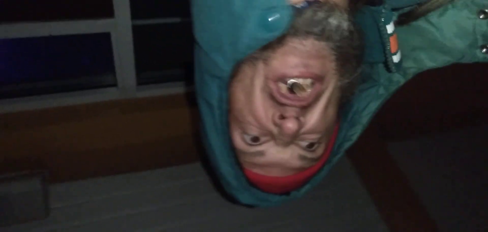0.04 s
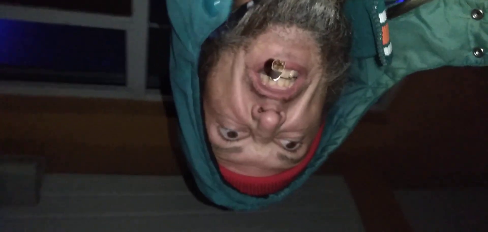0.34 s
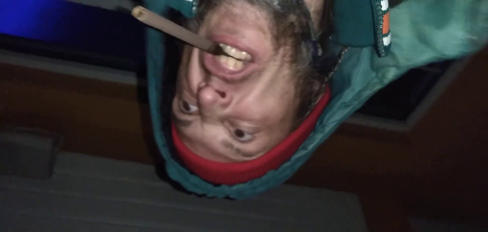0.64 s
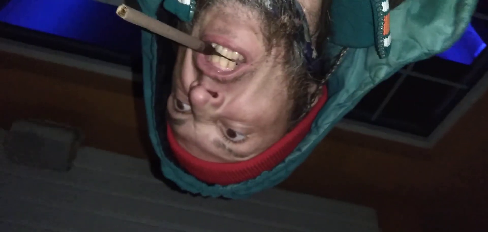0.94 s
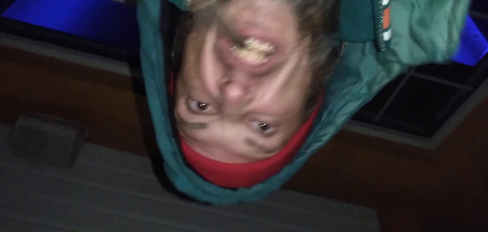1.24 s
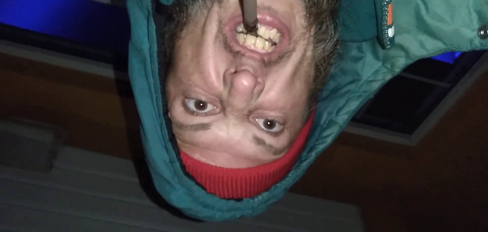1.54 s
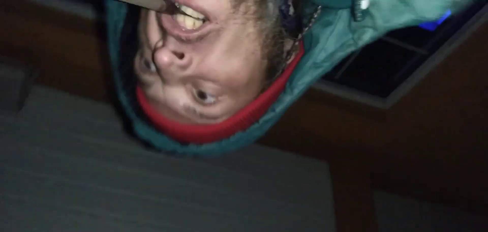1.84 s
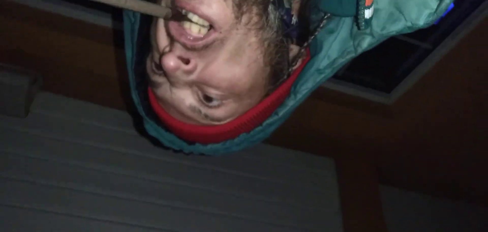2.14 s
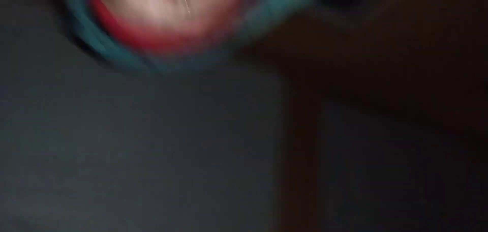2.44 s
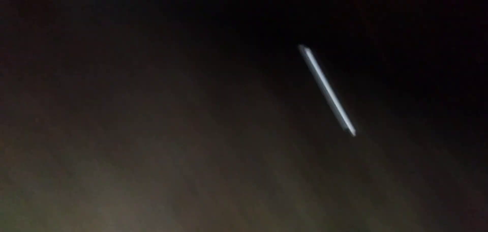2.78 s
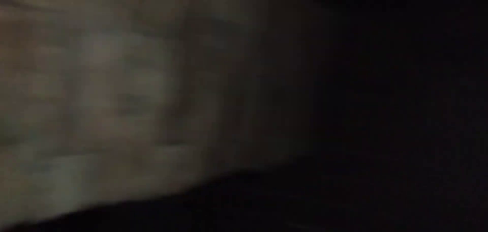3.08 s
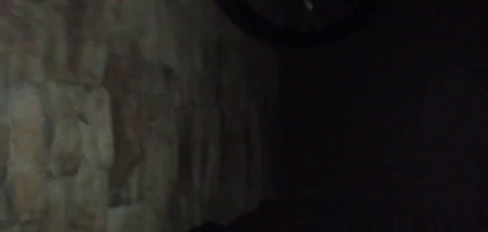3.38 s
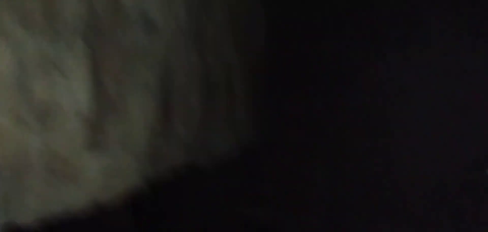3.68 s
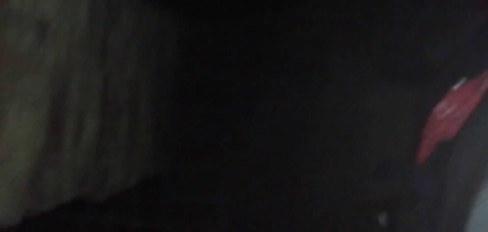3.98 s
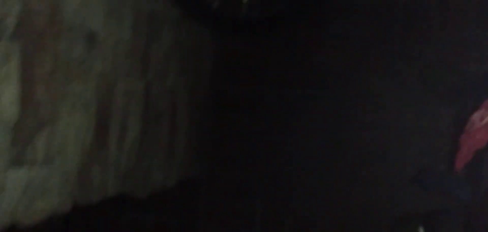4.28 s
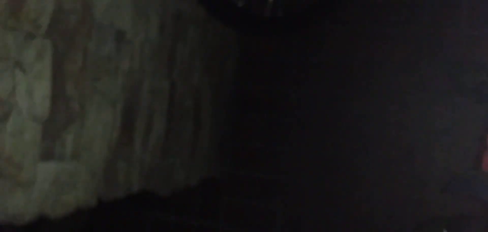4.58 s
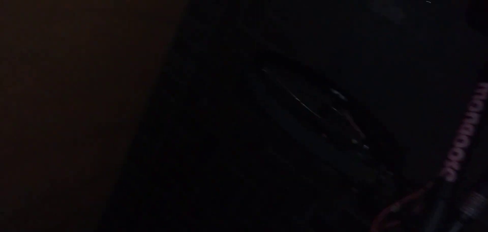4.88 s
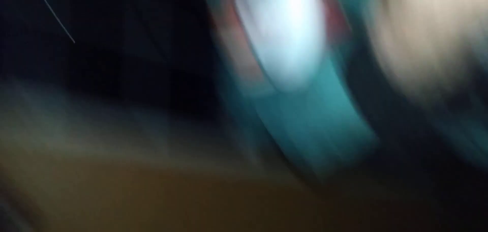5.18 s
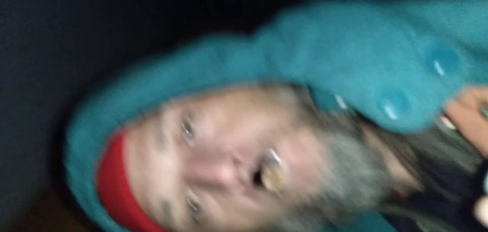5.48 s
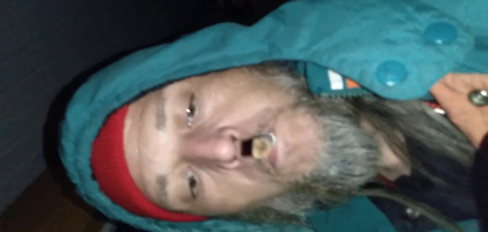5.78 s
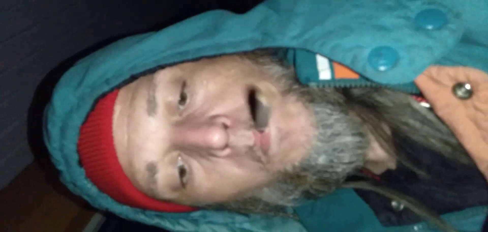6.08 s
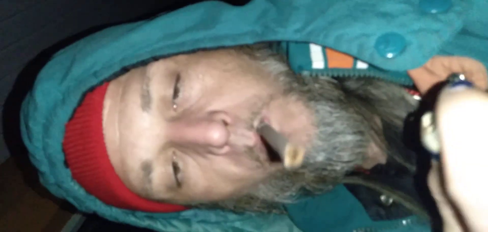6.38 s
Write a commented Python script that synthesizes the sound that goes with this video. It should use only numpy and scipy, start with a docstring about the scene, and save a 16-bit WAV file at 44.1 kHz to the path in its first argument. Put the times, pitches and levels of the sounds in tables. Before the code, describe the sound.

A faint distant rumble and a low electrical hum lie under the whole scene, a quiet porch at night. For the first two seconds a nylon jacket stirs softly near the microphone, with tiny, thin, ringing ticks on the right. Sharper ticks come around 2.3 seconds and a louder hissy swish at 2.8. From about 3.5 seconds the cloth drags across the left microphone in uneven, rasping rubs, with a sharp tick at 3.7 and one loud, short bump at 3.9. At 4.5 seconds a cigarette lighter gives a rapid burst of hard, bright clicks very close on the left, the loudest clicks heard. The jacket rasps again from about 5 seconds, and a second, softer and scratchier burst of clicks follows at 5.3 to 5.4. Faint swishes and a few light ticks continue until the end, at about 6.7 seconds.

```python
"""A nylon jacket swishes close to a phone's two microphones, held by a man on a quiet porch at night.
As he fetches a lighter, the weave slides over itself with a hiss and a rasp; the cloth also drags
across the left microphone and bumps it once. The lighter gives two bursts of sharp clicks, close left.
Tiny ticks ring the right microphone's port; distant rumble and a mains hum lie underneath."""
import sys
import numpy as np
from scipy import signal
from scipy.fft import rfft, irfft, next_fast_len
from scipy.io import wavfile
from scipy.ndimage import uniform_filter1d

SR = 44100
rng = np.random.default_rng(int(sys.argv[2]) if len(sys.argv) > 2 else 0)


def wrap_up_sound(samples):
    """Save the sound to the file named by the first command line argument, as 16-bit audio."""
    columns = np.atleast_2d(samples).T
    # keep every value between -1 and 1, then stretch to whole-number steps
    tamed = np.clip(columns, -1, 1)
    steps = np.round(tamed * 32767).astype(np.int16)
    wavfile.write(sys.argv[1], SR, steps)


N = 292277
TIME = np.arange(N) / SR

# The narrow resonance of the right microphone's port. Each row: frequency in Hz, gain in dB.
RIGHT_PORT = [(3500, -44), (5500, -21), (6600, -7), (7200, 1.5), (7800, -8.5), (9000, -24.5), (12000, -41),
              (16000, -43.5)]
# Cloth dragged across the left port, heard only there. Each row: start, attack, hold and release in
# seconds, then in dB before trims: swish, rasp and sheen relative to the swish, low rush.
LEFT_DRAGS = [(2.42, 0.38, 0.37, 0.16, -68, -2, -2.5, -62),
              (3.647, 0.17, 0.022, 0.027, -55, 3, -5.5, -51.5),
              (3.771, 0.091, 0.074, .03, -30.5, -11.5, -3, -47),
              (3.889, 0.038, .1, 0.0091, -30.5, -8.5, -12.5, -36),
              (4.007, 0.026, .41, 0.084, -45, -1.5, -25, -39),
              (4.108, 0.039, .01, 0.052, -32, -7, -10.5, -39),
              (4.171, .04, 0.037, 0.0085, -40, -12, -7, -37),
              (4.34, 0.047, 0.0085, 0.031, -33.5, -4.5, -8.5, -30),
              (4.472, 0.034, .055, .011, -33, -7, -3, -30),
              (4.573, 0.014, 0.022, 0.0021, -36.5, -8, -12.5, -38),
              (4.611, 0.0091, 0.074, 0.0052, -45, -9.5, -2.5, -53),
              (4.674, 0.016, 0.12, 0.12, -63, 9.5, -1.5, -59.5),
              (4.923, .05, 0.024, 0.037, -64, 8.5, -3, -64.5),
              (4.986, 0.13, 0.065, .03, -69.5, 23.5, 1, -53),
              (5.127, 0.056, .01, .018, -65, 21, -1.5, -44.5),
              (5.21, 0.072, 0.018, .025, -53, 16.5, 0.5, -42),
              (5.258, 0.0215, 0.039, .03, -45.5, 0, 2, -56),
              (5.325, 0.046, 0.025, 0.0068, -36, -4, -0.5, -48.5),
              (5.39, .02, 0.056, 0.077, -63, -1.5, 0, -58.5)]


def undb(db):
    """Decibels to gain."""
    return 10 ** (np.asarray(db) / 20)


def unit(x):
    """Scale to rms 1."""
    return x / np.std(x)


def response(spectrum, size):
    """Gain at each FFT bin, from rows of frequency in Hz and gain in dB."""
    hz, db = np.transpose(spectrum)
    bin_hz = np.arange(size // 2 + 1) * SR / size
    return undb(np.interp(np.log(bin_hz + 1), np.log(hz), db))


def colour(x, spectrum):
    """Give x a spectrum, at rms 1."""
    size = next_fast_len(N, True)
    return unit(irfft(rfft(x, size) * response(spectrum, size), size)[:N])


def ring(spectrum, size=1024):
    """Causal impulse response with the given spectrum, peak 1."""
    cepstrum = irfft(np.log(response(spectrum, size)))
    cepstrum[1:size // 2] *= 2  # minimum phase: the energy comes first
    cepstrum[size // 2 + 1:] = 0
    ringing = irfft(np.exp(rfft(cepstrum)))
    return ringing / np.abs(ringing).max()


def walk(rate):
    """Glide between random levels, rate of them a second, at rms 1."""
    hold = max(int(SR / rate), 2)
    steps = np.repeat(rng.standard_normal(N // hold + 1), hold)[:N]
    return unit(uniform_filter1d(steps, hold))


def friction(rate, spread_db, hiss):
    """Threads slipping over each other: about rate tiny snaps a second over a smooth hiss."""
    snaps = (rng.random(N) < rate / SR) * rng.choice([-1, 1], N)
    sizes = undb(spread_db * np.minimum(rng.exponential(size=N), 4))
    return unit(unit(snaps * sizes) + hiss * rng.standard_normal(N))


def folds(x, patchy_db=2.5, width_bins=4):
    """The folds of the cloth keep changing shape: narrow resonances come and go at random."""
    spectrum = signal.stft(x, nperseg=512)[2]
    patches = uniform_filter1d(rng.standard_normal(spectrum.shape), size=width_bins, axis=0)
    patches = unit(uniform_filter1d(patches, size=24, axis=1))
    return unit(signal.istft(spectrum * undb(patchy_db * patches))[1][:N])


def swells(moves, levels_db, bend=1.52):
    """Summed envelope of moves: the cloth speeds up (gently if bend > 1), slides steadily, runs out."""
    power = np.full(N, 1e-14)
    for (start, attack, hold, release), db in zip(moves[:, :4], levels_db):
        span = slice(max(int(start * SR), 0), int((start + attack + hold + 10 * release) * SR))
        t = TIME[span] - start
        speed = np.sin(np.pi / 2 * np.clip(t / attack, 0, 1)) ** bend
        run_out = np.exp(-np.maximum(t - attack - hold, 0) / release)
        power[span] += (undb(db) * speed * run_out) ** 2
    return np.sqrt(power)


def strikes(starts_s, peaks_db, spectrum, grit, tail_s):
    """Each blow is an impulse and a short scatter of vibration, heard through a resonance."""
    out, resonance = np.zeros(N), ring(spectrum)
    t = TIME[:len(resonance)]
    scatter = np.reshape(grit, (-1, 1)) * rng.standard_normal((len(starts_s), len(t)))
    for start_s, db, noise in zip(starts_s, peaks_db, scatter):
        force = (t == 0) + noise * np.exp(-t / tail_s)
        blow = signal.fftconvolve(force, resonance)
        start = int(start_s * SR)
        out[start:start + len(blow)] += (undb(db) * blow / np.abs(blow).max())[:N - start]
    return out


def night_air(level_db=-62, apart_hz=700):
    """Distant rumble around the porch; the bass is alike at both microphones, the treble is not."""
    # The porch's background noise. Each row: frequency in Hz, gain in dB.
    air_spectrum = [(20, -29), (45, -18), (90, 0.5), (170, 0.5), (260, -6), (400, -15.5), (550, -22),
                    (800, -21.5), (1300, -26.5), (3000, -38), (5500, -33.5), (7500, -31.5), (10000, -42.5),
                    (16000, -43.5)]
    lowpass = signal.butter(1, apart_hz, fs=SR, output="sos")
    highpass = signal.butter(1, apart_hz, "high", fs=SR, output="sos")
    bass = signal.sosfilt(lowpass, rng.standard_normal(N))
    trebles = signal.sosfilt(highpass, rng.standard_normal((2, N)))
    return undb(level_db) * np.array([colour(bass + treble, air_spectrum) for treble in trebles])


def mains_hum(waver_db=-0.14):
    """A faint hum, alike at both microphones; its partials change balance as the phone is turned round."""
    # The hum's partials. Each row: frequency in Hz, rms level in dB before the turn and after it.
    partials = [(61, -58.5, -65), (123.5, -70.5, -67.5), (185.5, -67.5, -68.5), (349, -94, -76.5)]
    # The turn of the phone: start and end in seconds.
    turn_s = [4.4, 5.2]
    hum = np.zeros(N)
    for hz, *levels_db in partials:
        db = np.interp(TIME, turn_s, levels_db) + waver_db * walk(rate=4)
        phase = 2 * np.pi * hz * TIME + 0.3 * walk(rate=4.2)
        hum += np.sqrt(2) * undb(db) * np.sin(phase)
    return hum


def ticks():
    """Light ticks of clothing and grip; the right port rings with them like a thin whistle."""
    # Touches on and near the phone. Each row: start in seconds, left peak in dB, right peak in dB.
    touches = [(0.1098, -64, -43.5), (0.278, -51, -44.5), (.2845, -53, -42), (0.345, -53, -43),
               (0.4182, -51, -35), (0.438, -47, -38.5), (.8341, -62, -44.5), (1.2554, -65, -52),
               (1.2728, -62, -44), (1.2844, -58, -45), (1.32, -58, -43), (1.3371, -48, -38),
               (1.3405, -49, -33), (1.4573, -64, -40), (1.4692, -70, -46), (1.7536, -57, -41.5),
               (2.2365, -24.5, -33), (2.3902, -36, -39), (2.3971, -26, -38), (2.4358, -38, -33),
               (2.4647, -42, -35), (2.496, -50, -39), (2.513, -47, -35), (2.5379, -44, -34.5),
               (2.6165, -31, -31.5), (2.7949, -29, -25), (2.8928, -30, -32), (3.345, -44, -49),
               (3.7484, -16.5, -42), (5.218, -52, -39), (5.6432, -33, -52), (6.12, -45.5, -56),
               (6.2764, -49.5, -61), (6.5894, -51.5, -58)]
    # A tick at the left microphone. Each row: frequency in Hz, gain in dB.
    left_spectrum = [(1500, -40), (4000, -14), (6300, -15.5), (7600, -3.5), (9500, -7.5), (12000, -13),
                     (16000, -32)]
    starts_s, left_db, right_db = np.transpose(touches)
    return np.array([strikes(starts_s, left_db, left_spectrum, grit=0.15, tail_s=0.0028),
                     strikes(starts_s, right_db, RIGHT_PORT, grit=0.054, tail_s=0.0046)])


def lighter(right_db=-38):
    """Hard, dry clicks right next to the left microphone; the right one barely hears them."""
    # Two bursts of clicks. Each row: start in seconds, level in dB, grit from 0 (snap) to 1 (scrape).
    clicks = [(4.4863, -13, .3), (4.4949, -13, .4), (4.4968, 1.5, .19), (4.4987, -9, .12),
              (4.511, -11, .15), (4.518, -9, .2), (4.5205, -10, .4), (4.5216, -1.5, .13), (4.5318, .5, .11),
              (4.5446, -.5, .05), (4.5632, -2.5, .07), (4.5951, -11, .2), (5.305, -16, .15),
              (5.3587, -13, .5), (5.3632, -11, .4), (5.365, -7, .35), (5.3731, -10, .5), (5.38, -11.5, .3),
              (5.383, -7, .35), (5.3853, -9, .2), (5.3902, -12, .4), (5.3935, -7, .35)]
    # The bright ring of one click. Each row: frequency in Hz, gain in dB.
    click_spectrum = [(300, -14), (1200, -6.5), (4000, -5), (6500, 2.5), (8000, 6.5), (10000, 0.5),
                      (13000, -1.5), (16000, -8)]
    starts_s, levels_db, grit = np.transpose(clicks)
    close = strikes(starts_s, levels_db, click_spectrum, grit, tail_s=0.001)
    return np.outer([1, undb(right_db)], close)


def bump(at_s=3.9279, push=3.6, start_hz=860, end_hz=125, settle_s=0.00081, decay_s=0.0013):
    """A knock on the left port: the trapped air rebounds ever more slowly and overloads the microphone."""
    t = np.maximum(TIME - at_s, 0)
    cycles = end_hz * t + (start_hz - end_hz) * settle_s * (1 - np.exp(-t / settle_s))
    pressure = push * np.sin(2 * np.pi * cycles) * np.exp(-t / decay_s)
    return -0.95 * np.tanh(pressure)


def rubbing(press_db=1, firm_db=-30, deepen=0.35, catch_db=2.0):
    """Cloth on the left port: an uneven rush, with a rumble that gains on it as it presses harder."""
    # The rush of cloth over the port. Each row: frequency in Hz, gain in dB.
    rush_spectrum = [(30, -28), (100, -10.5), (280, -7.5), (450, -1), (600, -1.5), (760, -2.5),
                     (1050, -6.5), (1500, -10), (2200, -16), (4000, -38)]
    # The rumble of cloth pressed onto it. Each row: frequency in Hz, gain in dB.
    rumble_spectrum = [(30, -27), (80, -14), (170, 0), (290, 1.5), (370, -2), (470, -10), (900, -26)]
    drags = np.array(LEFT_DRAGS)
    level_db = 20 * np.log10(swells(drags, drags[:, -1]))
    rush = colour(friction(rate=900, spread_db=-0.5, hiss=0.78), rush_spectrum)
    rush = folds(rush, patchy_db=2, width_bins=2)
    rumble = colour(friction(rate=430, spread_db=0, hiss=0.32), rumble_spectrum)
    rumble *= undb(press_db + deepen * (level_db - firm_db))
    return undb(level_db + catch_db * walk(rate=90)) * (rush + rumble)


def sleeve(rise=0.59, fall=1.22):
    """A sleeve catches quickly and runs out more slowly; each sweep is a hiss at its own steady pitch."""
    # Single sweeps of the sleeve. Each row: peak time and time scale in seconds,
    # left and right level in dB, band centre and width in Hz.
    sweeps = [(1.606, 0.046, -85, -71.5, 3100, 800), (1.841, 0.013, -69, -67, 4600, 4000),
              (1.897, 0.032, -58, -65, 4700, 3760), (1.99, 0.12, -72.5, -70.5, 4830, 2390),
              (2.224, 0.018, -66, -64, 4260, 2600), (2.585, 0.15, -61, -64, 3470, 1390),
              (2.759, 0.031, -37.5, -52, 5480, 3420), (5.174, 0.013, -39.5, -62, 2330, 3800),
              (5.62, 0.032, -63, -78, 4670, 1610), (6.573, 0.04, -58, -80, 4290, 1600)]
    out = np.zeros((2, N))
    slips = friction(rate=2000, spread_db=1.5, hiss=0.94)
    for peak_s, scale_s, left_db, right_db, centre_hz, width_hz in sweeps:
        edges_hz = [max(centre_hz - width_hz / 2, 200), centre_hz + width_hz / 2]
        band = signal.butter(2, edges_hz, "band", fs=SR, output="sos")
        spread_s = scale_s * np.where(TIME < peak_s, rise, fall)
        swell = np.exp(-0.5 * ((TIME - peak_s) / spread_s) ** 2)
        out += np.outer(undb([left_db, right_db]), swell * unit(signal.sosfilt(band, slips)))
    return out


def nylon(moves, levels_db, port, weave, swish_trim_db, sheen_trim_db, catch_db, rasp_trim_db=-1):
    """Sliding nylon at one microphone: the port resonates to a swish, folds rasp, the weave adds sheen."""
    # The coarse rasp of the folds. Each row: frequency in Hz, gain in dB.
    rasp_spectrum = [(150, -20.5), (500, -7.5), (850, -8), (1300, -1.5), (1700, -0.5), (2050, 3), (2400, 2),
                     (3100, 2), (4200, 0.5), (6000, -2), (8000, -22), (11000, -37)]
    rasp_db, sheen_db = moves[:, 5:7].T
    level = swells(moves, levels_db)
    rasp_gain = swells(moves, levels_db + rasp_db + rasp_trim_db) / level
    sheen_gain = swells(moves, levels_db + sheen_db + sheen_trim_db) / level
    swish = undb(swish_trim_db) * colour(friction(rate=2500, spread_db=1.5, hiss=0.8), port)
    rasp = rasp_gain * colour(friction(rate=1700, spread_db=3, hiss=1.0), rasp_spectrum)
    sheen = sheen_gain * colour(friction(rate=2000, spread_db=3.5, hiss=0.9), weave)
    cloth = swish + rasp + sheen
    catching = undb(catch_db * walk(rate=130))  # the cloth catches and lets go
    return level * catching * np.std(cloth) * folds(cloth)


def jacket():
    """Nylon strokes nylon within arm's reach of both microphones; the left also hears the drags' swish."""
    # Strokes of the jacket, led by a faint stir that never stops. Each row: start, attack, hold and
    # release in seconds, then in dB before trims: left swish, rasp and sheen relative to the swish,
    # right swish.
    strokes = [(0, 0.004, 6.6, .1, -80, -2, -3.5, -80.5), (0.158, 0.13, .17, .06, -68, -9, -3.5, -69.5),
               (.39, .025, .03, 0.049, -75, -8.5, -12, -62.5),
               (0.514, 0.043, 0.025, .03, -69, -11, -7, -61.5),
               (0.573, 0.29, .08, .07, -82, -25.5, -31, -63),
               (1.29, 0.057, .05, .05, -76, -13.5, -3.5, -69.5),
               (1.534, .05, .1, 0.32, -69, -2.5, -12, -66),
               (1.812, 0.054, .06, 0.032, -50, -20.5, 1, -60.5),
               (1.93, .05, .1, 0.38, -59, -13.5, -5.5, -67),
               (2.188, 0.045, .002, 0.0091, -45, -27.5, -8.5, -63),
               (2.375, 0.01, 0.015, 0.0031, -45.5, -14, -4.5, -51),
               (2.388, .02, .1, .05, -63, -10.5, -3.5, -59.5),
               (2.465, 0.17, .03, 0.073, -48, -4, -6, -51.5),
               (2.717, 0.08, 0.023, .055, -32, -15.5, -9.5, -46),
               (2.752, 0.13, 0.039, 0.16, -48, -1, -6, -57), (3.04, .1, .04, 0.044, -49, -6, -8.5, -62),
               (3.143, 0.12, .25, .05, -53.5, -6.5, -3.5, -62.5),
               (3.487, 0.21, 0.12, .05, -44.5, -11, -5.5, -51),
               (3.692, .15, .15, 0.14, -43, -2, -5.5, -47.5), (4.45, .2, .12, .05, -65, 0.5, -7, -64),
               (4.761, 0.097, .02, 0.073, -62.5, 3, -7.5, -55.5),
               (4.969, 0.2, 0.27, .1, -70.5, -6.5, -6.5, -60.5),
               (5.374, 0.032, .05, .13, -53.5, -1.5, -0.5, -71),
               (5.575, 0.054, 0.011, .035, -55, -10, -1.5, -68),
               (5.721, 0.085, 0.041, .03, -63.5, -10.5, 5, -82.5),
               (5.943, 0.043, .01, .025, -65.5, -7, -1.5, -80.5),
               (6.091, 0.031, .06, 0.054, -71.5, -4, 5, -85), (6.22, 0.076, .09, 0.034, -64, -8, 5, -83),
               (6.41, 0.12, .06, 0.075, -68, 0, 5, -83.5)]
    # The broad resonance of the left microphone's port. Each row: frequency in Hz, gain in dB.
    left_port = [(2500, -32), (4500, -14.5), (6200, -7.5), (7300, -2), (8300, 1), (9500, -4.5), (11500, -9),
                 (15000, -39.5)]
    # The fine sheen of the weave at each microphone. Each row: frequency in Hz, gain in dB.
    left_weave = [(5000, -27), (8500, -9.5), (10000, -4.5), (12000, 2), (14000, 2.5), (15800, -2.5)]
    right_weave = [(5000, -13), (7800, 5.5), (9500, 6), (11000, -2.5), (13000, -3), (15800, -5.5)]
    left_moves, right_moves = np.array(strokes + LEFT_DRAGS), np.array(strokes)
    left = nylon(left_moves, left_moves[:, 4], left_port, left_weave,
                 swish_trim_db=-0.5, sheen_trim_db=-1, catch_db=0.87)
    right = nylon(right_moves, right_moves[:, 7], RIGHT_PORT, right_weave,
                  swish_trim_db=-1.5, sheen_trim_db=-0.5, catch_db=0.3)
    return left, right


def scene():
    """The porch from the man's hand: both microphones hear the jacket, only the left is touched by it."""
    left, right = jacket()
    cloth = np.array([left + rubbing() + bump(), right]) + sleeve()
    return cloth + lighter() + ticks() + night_air() + mains_hum()


def record(dry, bass_hz=46, top_hz=16000, ceiling=0.92):
    """The phone sheds the deepest bass, clips just under full scale and cuts the top."""
    highpass = signal.butter(5, bass_hz, "high", fs=SR, output="sos")
    lowpass = signal.ellip(8, 0.2, 70, top_hz, fs=SR, output="sos")
    clipped = np.clip(signal.sosfilt(highpass, dry), -ceiling, ceiling)
    return signal.sosfilt(lowpass, clipped)


dry = scene()
out = record(dry)
wrap_up_sound(out)
```